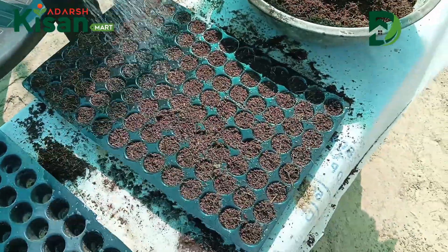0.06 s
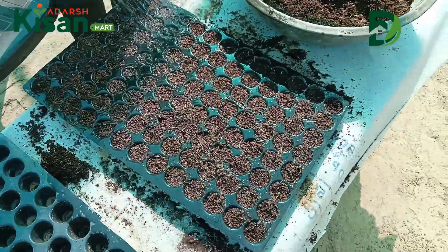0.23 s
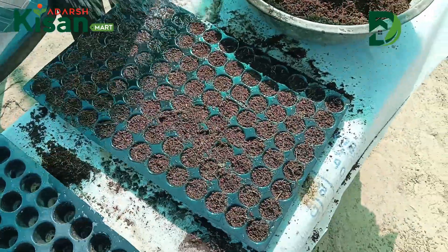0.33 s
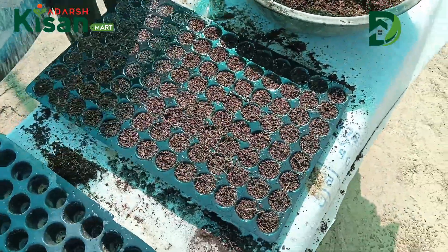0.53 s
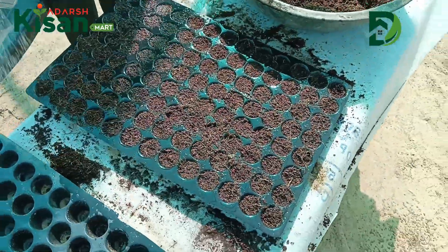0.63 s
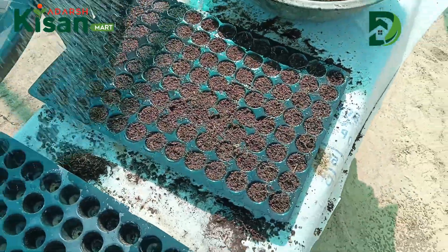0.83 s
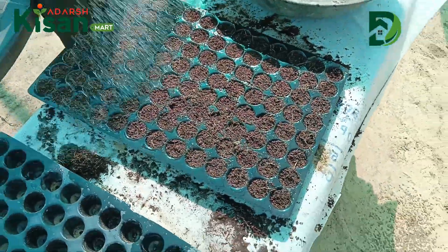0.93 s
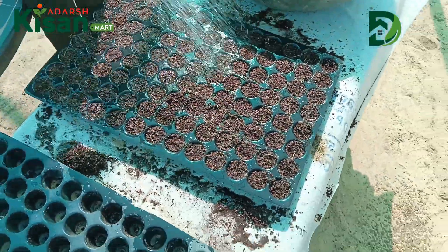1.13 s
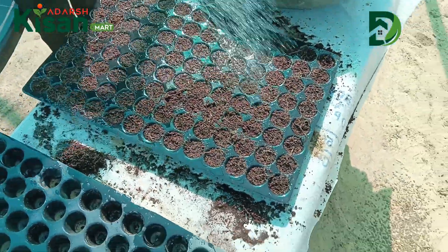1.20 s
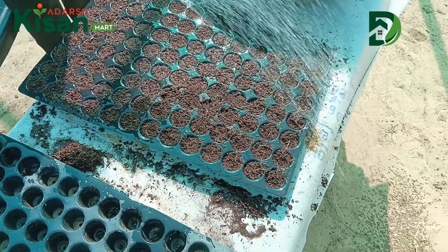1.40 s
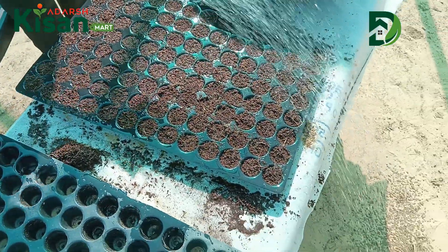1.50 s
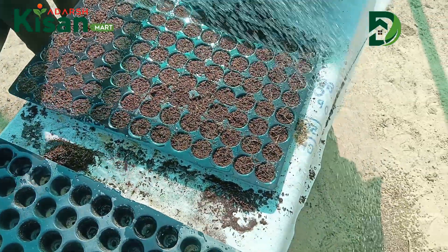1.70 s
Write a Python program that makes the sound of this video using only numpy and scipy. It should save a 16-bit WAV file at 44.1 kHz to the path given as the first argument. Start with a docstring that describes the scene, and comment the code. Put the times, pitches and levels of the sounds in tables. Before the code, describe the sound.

Water sprinkles onto a plastic seedling tray, close by outdoors, as a soft hiss and patter. A heavier splash swells with a hollow rumble and gurgle, then fat drops plop on the plastic. Light wind puffs touch the microphone.

```python
"""Outdoors, close to a phone, a watering rose sweeps over a plastic seedling tray.
Fine drops patter as a high hiss; a heavier splash swells and passes over a hollow rumble,
with bubbles and a sinking gurgle. Fat drops plop and slap on the plastic and set it ringing.
Puffs of air buffet the microphone ports above a faint, low outdoor bed."""
import sys
import numpy as np
from scipy import signal
from scipy.fft import rfft, irfft, next_fast_len
from scipy.io import wavfile
from scipy.ndimage import uniform_filter1d

SR = 44100
rng = np.random.default_rng(int(sys.argv[2]) if len(sys.argv) > 2 else 0)


def dump(signal):
    """Clip the signal to [-1, 1] and save it as 16-bit WAV at the path in sys.argv[1]."""
    limited = np.clip(np.atleast_2d(signal).T, -1, 1)
    pcm = np.round(limited * 32767).astype(np.int16)
    wavfile.write(sys.argv[1], SR, pcm)


N = 77175
T = np.arange(N) / SR


def undb(db):
    """Decibels to gain."""
    return 10 ** (np.asarray(db) / 20)


def unit(x):
    """Scale to rms 1."""
    return x / np.sqrt(np.mean(x ** 2))


def pan(db):
    """Stereo gains for a pan given as left minus right in dB."""
    return undb(np.array([db, -db]).reshape(2, -1) / 2)


def colour(x, table, column=1):
    """Minimum-phase EQ through (f/Hz, gain/dB) points; column picks the gains."""
    points, size = np.array(table, float), next_fast_len(N + 8192) * 2
    hz = np.maximum(np.arange(size // 2 + 1) * SR / size, 1)
    gain = undb(np.interp(np.log(hz), np.log(points[:, 0]), points[:, column]))
    cepstrum = irfft(np.log(gain))
    cepstrum[1:size // 2] *= 2
    cepstrum[size // 2 + 1:] = 0
    return irfft(rfft(x, size) * np.exp(rfft(cepstrum)))[..., :N]


def swell(table, column=1):
    """Fader ride through (t/s, level/dB) points, silent outside them."""
    points = np.array(table, float)
    return undb(np.interp(T, points[:, 0], points[:, column], left=-np.inf, right=-np.inf))


def fade(t, t60):
    """Exponential decay, 60 dB down at t60."""
    return np.exp(-np.log(1000) * t / t60)


def steady(x, span_s):
    """Ride a noise to rms 1 over a sliding span."""
    return x / np.sqrt(uniform_filter1d(x ** 2, max(int(span_s * SR), 2), axis=-1) + 1e-18)


def add(out, s, x):
    """Mix a sound in at s seconds."""
    i = int(np.clip(s * SR, 0, N - 1))
    out[:, i:i + x.shape[-1]] += x[..., :N - i]


def wander(hz, shape):
    """Complex noise low-passed at hz: a smooth random drift of level and phase."""
    lowpass = signal.butter(2, hz, fs=SR, output="sos")
    real, imag = (unit(signal.sosfilt(lowpass, rng.standard_normal(shape))) for _ in range(2))
    return real + 1j * imag


def resonance(hz, width_hz):
    """Narrow ringing stirred by many drops, partly alike at both ports."""
    stir = wander(width_hz, (3, N))
    carrier = np.exp(2j * np.pi * np.cumsum(np.broadcast_to(hz, N)) / SR)
    return np.imag((stir[0] + .7 * stir[1:]) * carrier) / 1.22


def patter(per_s, spread_db, lag_samples=16):
    """Random impacts, mostly small; each reaches the two ports with its own lag and strength."""
    when, size, polarity, side, *lags = rng.random((int(per_s * N / SR), 6)).T
    strength = undb(spread_db * np.minimum(-np.log(1 - size), 5)) * np.sign(polarity - .5)
    out = np.zeros((2, N))
    for port in range(2):
        at = (when * (N - lag_samples) + lags[port] * lag_samples).astype(int)
        out[port] = np.bincount(at, strength * (.5 + abs(port - side)), N)
    return unit(out)


def scatter(x, db, t60):
    """Add a short diffuse tail, like reflections from nearby surfaces."""
    t = T[:SR // 4]
    tail = rng.standard_normal((2, len(t))) * fade(t, t60) * (1 - np.exp(-(t / 0.0033) ** 2))
    tail /= np.sqrt(np.sum(tail ** 2, axis=1, keepdims=True))
    return x + undb(db) * signal.fftconvolve(x, tail, axes=1)[:, :N]


# sweep of the spray: t/s, level/dB, pan before narrowing/dB
SPRAY_SWEEP = [(0.0, -54, 6), (0.062, -58.5, 4), (0.13, -60, -2.0), (0.18, -61, 6.5), (0.208, -55.5, -9),
               (0.214, -54.5, 4.5), (0.36, -59, 0.5), (0.452, -66.5, -13), (0.544, -64.5, -2.5),
               (0.622, -65, -2), (0.638, -55.5, -5), (0.672, -64.5, -3), (0.744, -55, -6.5),
               (0.994, -55, 2.5), (1.568, -63.5, -4.5), (1.594, -57.5, 1), (1.656, -65, -3),
               (1.75, -58.5, 2.5)]
# EQ of the fine drops: f/Hz, left/dB, right/dB
SPRAY_EQ = [(655, -14.5, -17), (2700, -10.5, -11.5), (3820, -20, -29), (5570, -11, -10), (6700, -28, -37.5),
            (6850, -17, -10), (7314, 8, -14.5), (7920, 5.5, 6), (9080, -5, -37), (9330, -4, -20.5),
            (9770, -52.5, 4), (10530, -3, 4.5), (11490, -51, -3), (10740, -38, -5.5), (12250, -55, -7.5),
            (14400, -32, -47)]
def spray(trim_db=-1, mist_db=-6.5, pan_width=0.64):
    """Fine drops tick on soil and plastic, each smeared by a tiny splash, over a smooth mist."""
    drops = unit(scatter(patter(per_s=1900, spread_db=3.95), db=-3, t60=.012))
    drops = drops + undb(mist_db) * rng.standard_normal((2, N))
    hiss = unit(np.array([colour(drops[port], SPRAY_EQ, column=port + 1) for port in range(2)]))
    s, db, side = np.array(SPRAY_SWEEP).T
    return hiss * undb(trim_db + np.interp(T, s, db)) * pan(pan_width * np.interp(T, s, side))


# ride of the spray's crisp top: t/s, level/dB
CRACKLE_RIDE = [(0, -70), (.1, -81), (.3, -87), (.45, -108), (.68, -98), (.76, -66.5), (.82, -71),
                (.9, -72), (1.0, -69.5), (1.14, -73), (1.3, -72), (1.42, -86), (1.5, -78), (1.65, -86),
                (1.69, -69), (1.75, -88)]
# EQ of that top: f/Hz, gain/dB
CRACKLE_EQ = [(3000, -1), (9000, -22), (10300, 0), (11500, -5), (13000, -2), (15500, -12)]
def crackle():
    """The nearest fine drops add a bright crackle on the right."""
    drops = unit(colour(patter(per_s=2200, spread_db=2.9), CRACKLE_EQ))
    return drops * swell(CRACKLE_RIDE) * pan(-14.5)


# ride of the heavy splash: t/s, body/dB, treble/dB
SPLASH_RIDE = [(.40, -83, -69), (.445, -67, -76), (.486, -66, -76), (.505, -54.5, -78), (.53, -50, -66),
               (.595, -42.5, -78), (.628, -49.5, -71), (.66, -51.5, -60.5), (.704, -54, -65.5),
               (.735, -49, -60.5), (.76, -52.5, -55.5), (.81, -45, -49), (.832, -47, -53),
               (.86, -56, -59.5), (.93, -75, -58), (.98, -59.5, -94)]
# EQ of splashing water: f/Hz, left/dB, right/dB
SPLASH_EQ = [(440, -27, -22.5), (720, -4, -14.5), (1286, -4, 8.5), (1780, -12.5, -8.5), (3350, -8, -3.5),
             (4400, -3.5, -7), (5360, -10, -5), (5740, -29, -15.5), (7300, -32, -18), (7820, -12, -3),
             (9200, -18, -25.5), (12000, -37, -41.5)]
def splash(crossover_hz=2200, body_db=-4.5, treble_db=0.5):
    """Dense heavy drops, dull at first and brighter at their height."""
    drops = patter(per_s=3500, spread_db=1)
    wet = np.array([colour(drops[port], SPLASH_EQ, column=port + 1) for port in range(2)])
    bands = (signal.butter(4, crossover_hz, kind, fs=SR, output="sos") for kind in ("low", "high"))
    body, treble = (unit(signal.sosfilt(band, wet)) for band in bands)
    body *= swell(SPLASH_RIDE) * undb(body_db)
    treble *= swell(SPLASH_RIDE, column=2) * undb(treble_db)
    return body + treble


# low modes of the tray: f/Hz, level/dB, t60/s
DRUM_MODES = [(128.6, 2.5, 0.057), (193, 0.5, 0.078), (219, -1, 0.084), (299.6, -2.5, 0.079),
              (366.2, -8, 0.071)]
# hollow thumps: t/s, relative peak/dB
THUMP_CUES = [(.465, -28.5), (.494, -23), (.519, -19), (.545, -18.5), (0.574, -18.5), (.599, -26),
              (.624, -33)]
# ride of the rumble under the splash: t/s, level/dB
RUMBLE_RIDE = [(.40, -71), (.44, -50), (.468, -34.5), (.485, -51), (.52, -26), (.55, -34.5), (.6, -31),
               (.645, -40.5), (.68, -63.5)]
# EQ of the rumble: f/Hz, gain/dB
RUMBLE_EQ = [(25, -49), (60, -3), (110, 7.5), (180, 5), (320, -4.5), (400, -14.5), (520, -18), (900, -76)]
def rumble(attack_s=0.013, thump_db=-6.5, noise_db=-4, left_lag_s=0.00038):
    """The tray drums in a quick run of thumps over low noise, reaching the right port first."""
    thumps, t = np.zeros((1, N)), T[:SR // 6]
    ring = sum(undb(db) * fade(t, t60) * np.sin(2 * np.pi * hz * t) for hz, db, t60 in DRUM_MODES)
    ring *= 1 - np.exp(-t / attack_s)
    for s, db in THUMP_CUES:
        add(thumps, s, undb(db + thump_db) * ring / abs(ring).max())
    noise = steady(colour(rng.standard_normal(N), RUMBLE_EQ), span_s=0.0307)
    right = thumps[0] + noise * swell(RUMBLE_RIDE) * undb(noise_db)
    return np.array([np.interp(T - left_lag_s, T, right), right])


# fat drops, plus one long ring of a tray hollow at 1.187 s: t/s, f/Hz, level/dB, pan/dB, t60/s
PLOP_CUES = [(.002, 1888, -66.5, -18, 0.1), (0.419, 1333, -58.5, -23, 0.067), (0.442, 1331, -56, -20, 0.06),
             (.494, 1884, -42, 1.5, 0.03), (.633, 3506, -47.5, -1, .05), (.711, 928, -42.5, -10, 0.062),
             (.883, 1260, -55, -8, 0.039), (0.968, 1250, -54.5, -20, 0.055), (.99, 1273, -58, -9, 0.049),
             (1.017, 1870, -58, 2, 0.11), (1.088, 1284, -61, -14, .05), (1.122, 1245, -48.5, -18, 0.028),
             (1.187, 2945, -64, -8, 0.42), (1.227, 1623, -53.5, -6, 0.024), (1.25, 2341, -61, 11, 0.1),
             (1.368, 1310, -61, -6, 0.022), (1.404, 2800, -61, 9, 0.16), (1.595, 1700, -35, -3.5, 0.013),
             (1.631, 1314, -52.5, -5, 0.032)]
def plops(attack_s=.004, wobble_hz=90, overtone_ratio=2.02, overtone_db=-16, spatter_db=-23.5):
    """Each fat drop swells into one short wavering tone with an overtone and a little spatter."""
    out, t = np.zeros((2, N)), T[:SR // 5]
    spatter = unit(colour(patter(per_s=1500, spread_db=3.5), SPLASH_EQ, column=2))
    for s, hz, db, side, t60 in PLOP_CUES:
        env = (1 - np.exp(-(t / attack_s) ** 2)) * fade(t, t60)
        wobble = 1 + .35 * wander(wobble_hz, (2, len(t)))
        turn = 2j * np.pi * hz * t
        tone = np.imag(wobble * (np.exp(turn) + undb(overtone_db) * np.exp(overtone_ratio * turn)))
        tone += undb(spatter_db) * np.roll(spatter, -int(s * SR), axis=1)[:, :len(t)]
        add(out, s, undb(db) * pan(side) * env / env.max() * tone)
    return scatter(out, db=-7, t60=0.13)


# ringing modes of the tray: f/Hz, level/dB, t60/s
TRAY_MODES = [(415, -19.5, .15), (450.7, -20.5, .13), (1075, -15, 0.081), (1305, -21.5, 0.22),
              (1518, -9, 0.1), (1780, 4, 0.056), (2064, -11, 0.18), (2420, -2, 0.074), (2970, -3.5, 0.087),
              (3400, -13.5, 0.15), (5380, -7.5, 0.072), (5614, -7, 0.06), (7400, -10.5, 0.089),
              (8400, -39, 0.077)]
# slaps on the tray: t/s, level/dB, pan/dB, tilt/(dB per octave), ring/dB
SLAP_CUES = [(0.08, -58.5, 2, 4, 0), (.437, -52, 3.5, -6, 0.5), (.497, -52, 2, -4, 5.5),
             (0.6333, -35, -1, 1.5, -8.5), (1.123, -47.5, 6.5, -1, 1.5), (1.141, -52.5, -1, 1, -2),
             (1.2265, -57, 0, 2.5, 5), (1.246, -62.5, -11, 0, 2), (1.597, -39, -5.5, -2.5, 3.5),
             (1.612, -48, -7.5, -5, 6), (1.632, -51, -4, -1, -3)]
def slaps(attack_s=.002, pivot_hz=2000, spatter_db=-3):
    """A slug of water rings the tray and bursts into spatter."""
    out, t = np.zeros((2, N)), T[:SR // 4]
    hz, mode_db, t60 = np.array(TRAY_MODES).T[:, :, None]
    for s, db, side, tilt, ring_db in SLAP_CUES:
        gain = undb(mode_db + tilt * np.log2(hz / pivot_hz))
        phase = rng.random((2, len(TRAY_MODES), 1))
        detune = 1 + 0.024 * rng.standard_normal(hz.shape)
        modes = gain * fade(t, t60) * np.sin(2 * np.pi * (hz * detune * t + phase))
        ring = np.sum(modes, axis=1) / np.sqrt(np.sum(gain ** 2) / 2)
        tilted_eq = [(f, right + tilt * np.log2(f / pivot_hz)) for f, _, right in SPLASH_EQ]
        noise = unit(colour(rng.standard_normal((2, N)), tilted_eq))
        spatter = noise[:, :len(t)] * fade(t, t60=0.085)
        hit = undb(ring_db) * ring + undb(spatter_db) * spatter
        add(out, s, undb(db) * pan(side) * hit * (1 - np.exp(-t / attack_s)))
    return out


# single near drops: t/s, f/Hz, peak/dB, pan/dB
TICK_CUES = [(.101, 10600, -54, -17), (.124, 10400, -49, -16), (.2042, 7740, -33.5, 6),
             (0.282, 8000, -49.5, 16), (.748, 10550, -44.5, -12), (.829, 10600, -51, -6),
             (0.902, 7900, -46, -1), (0.971, 7800, -57, -6), (1.003, 7800, -42.5, 2),
             (1.021, 7560, -49, -2), (1.275, 7720, -44.5, 0), (1.31, 10040, -47.5, -8),
             (1.4755, 8400, -55, 5), (1.681, 10360, -46, -7), (1.6867, 8200, -59, 11),
             (1.704, 8140, -56.5, 20)]
def ticks(attack_s=.00045):
    """Single drops near the phone ring sharply for a millisecond or two."""
    out, t = np.zeros((2, N)), T[:SR // 50]
    env = (1 - np.exp(-(t / attack_s) ** 2)) * fade(t, t60=0.0028)
    for s, hz, db, side in TICK_CUES:
        add(out, s, undb(db) * pan(side) * env / env.max() * np.sin(2 * np.pi * hz * t))
    return scatter(out, db=-6.5, t60=0.11)


# ride of the trickle between splashes: t/s, level/dB
TRICKLE_RIDE = [(0, -62), (.14, -85), (.38, -66.5), (.46, -67), (.9, -86), (1.05, -67.5), (1.15, -68),
                (1.26, -67), (1.33, -89), (1.55, -68.5), (1.64, -66), (1.7, -92), (1.75, -67)]
def water_flow(splash_db, trickle_db):
    """Gain that follows the water running over the tray: splash body plus trickle."""
    return swell(SPLASH_RIDE) * undb(splash_db) + swell(TRICKLE_RIDE) * undb(trickle_db)


def bubbles(per_s=600, low_hz=754, high_hz=3705, t60_cycles=45, spread_db=9, tilt_db=1.5):
    """Tiny bubbles ring in the wet cells, loudest under the splash."""
    out, t = np.zeros((2, N)), T[:SR // 12]
    attack = 1 - np.exp(-t / 0.00033)
    for when, pitch, size, side, lag in rng.random((int(per_s * N / SR), 5)):
        hz = low_hz * (high_hz / low_hz) ** pitch
        port_phase = np.array([[0], [1.3 * (lag - .5)]])
        ring = np.sin(2 * np.pi * (hz * t + port_phase)) * fade(t, t60_cycles / hz)
        gain = undb(spread_db * size + tilt_db * pitch) * pan(12 * (side - .5))
        add(out, when * N / SR, gain * ring * attack)
    return steady(out, span_s=0.045) * water_flow(splash_db=-5.5, trickle_db=-5)


# hollows of the wet tray: f/Hz, half width/Hz, level/dB
CAVITY_MODES = [(1271, 48, 8), (1797, 94, 3), (2450, 89, -2.5), (3105, 44, -15.5), (4380, 23, -14),
                (5460, 220, -18)]
def cavities():
    """The hollows of the tray ring as long as water runs over them."""
    ring = unit(sum(undb(db) * resonance(hz, width) for hz, width, db in CAVITY_MODES))
    return ring * water_flow(splash_db=-11.5, trickle_db=-10)


# downward glide of the gurgle: t/s, f/Hz, level/dB
GURGLE_GLIDE = [(0.699, 960, -84), (0.726, 909, -58), (.76, 836.7, -57), (.80, 767, -63), (.84, 689, -60),
                (.875, 640, -69.5), (.91, 615, -87)]
def gurgle():
    """A hollow resonance falls in pitch as the splash passes."""
    s, hz, _ = np.array(GURGLE_GLIDE).T
    ring = resonance(np.interp(T, s, hz), width_hz=80)
    return steady(ring, span_s=0.053) * swell(GURGLE_GLIDE, column=2)


# puffs of air on the ports: t/s, half length/s, left/dB, right/dB, centre f/Hz
PUFF_CUES = [(0.061, 0.021, -72, -53, 85), (0.15, 0.035, -45.5, -69, 52), (.222, 0.022, -45.5, -38, 64.2),
             (0.247, 0.0076, -61, -27.5, 99), (0.27, 0.016, -49, -32.5, 90.5),
             (0.316, 0.012, -58, -29, 110), (0.337, 0.03, -49, -44.5, 71), (0.432, 0.053, -85, -45.5, 82),
             (0.719, 0.016, -66, -50, 67)]
# EQ of one puff: f/centre f, gain/dB
PUFF_EQ = [(.2, -23), (.5, -12.5), (.8, 6), (1.3, 1.5), (2.1, -19.5), (3.4, -31), (6.5, -56), (13, -58)]
def puffs():
    """Short eddies buffet each port on its own; slow ones tend to be deeper."""
    out = np.zeros((2, N))
    for s, half_s, left, right, hz in PUFF_CUES:
        eq = [(ratio * hz, db) for ratio, db in PUFF_EQ]
        eddy = steady(colour(rng.standard_normal((2, N)), eq), span_s=0.0218)
        out += eddy * undb([[left], [right]]) * np.exp(-((T - s) / half_s) ** 2)
    return out


# EQ of the outdoor bed: f/Hz, gain/dB
AIR_EQ = [(20, -11), (50, -4.5), (90, -1), (180, 0.5), (270, -16), (500, -15.5), (1000, -24), (2000, -22),
          (5000, -27), (15000, -44)]
# ride of the outdoor bed: t/s, level/dB
AIR_RIDE = [(0, -68), (.8, -72.5), (1.0, -69), (1.35, -69.5), (1.5, -66), (1.63, -62), (1.75, -69.5)]
def air(width=0.34):
    """A faint, low outdoor bed, mostly in the centre."""
    mid, side = unit(colour(rng.standard_normal((2, N)), AIR_EQ))
    return swell(AIR_RIDE) * (mid + width * side * np.array([[1], [-1]]))


def scene():
    """Running water and single drops over the tray's rumble, wind puffs and the outdoor bed."""
    water = spray() + crackle() + splash() + bubbles() + gurgle() + cavities()
    drops = plops() + slaps() + ticks()
    return water + drops + rumble() + puffs() + air()


def record(dry, low_cut_hz=45, high_cut_hz=15750):
    """The phone thins the deepest bass and cuts the top."""
    thin = signal.sosfilt(signal.butter(3, low_cut_hz, "high", fs=SR, output="sos"), dry)
    return signal.sosfilt(signal.ellip(10, .2, 70, high_cut_hz, fs=SR, output="sos"), thin)


dry = scene()
out = record(dry)
dump(out)
```